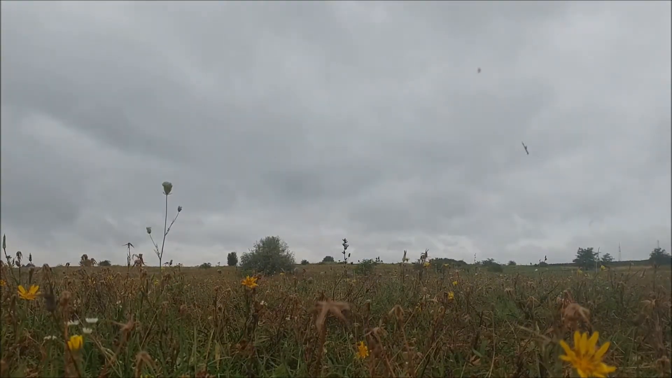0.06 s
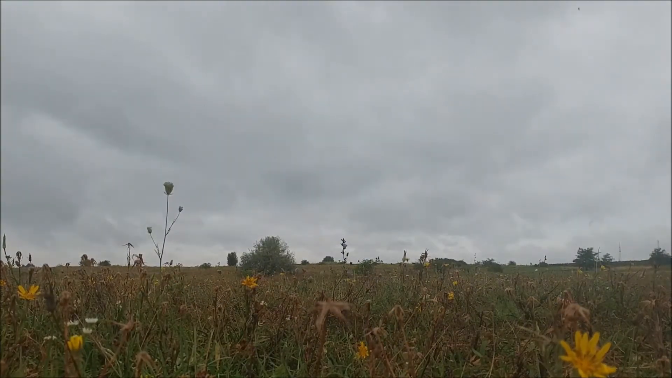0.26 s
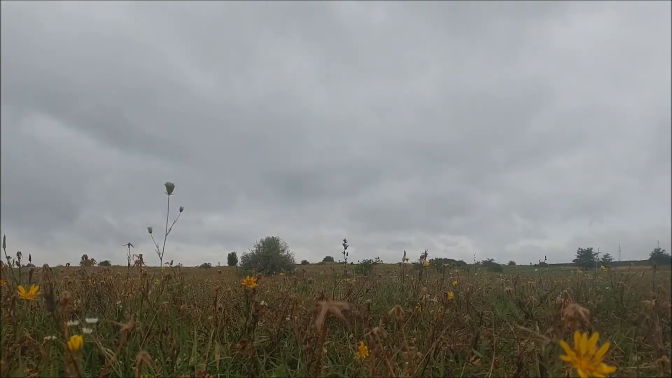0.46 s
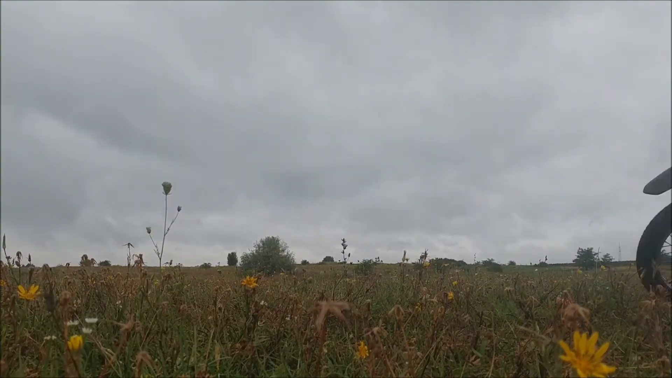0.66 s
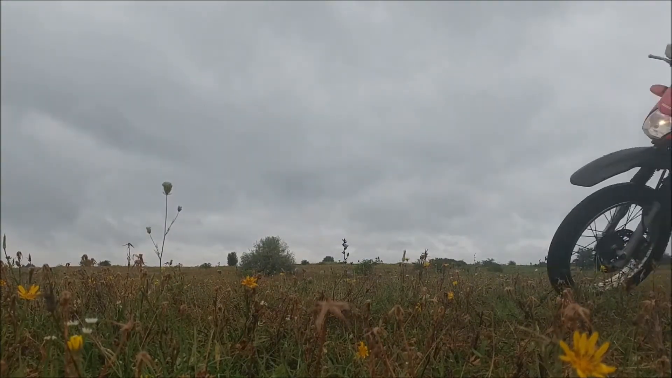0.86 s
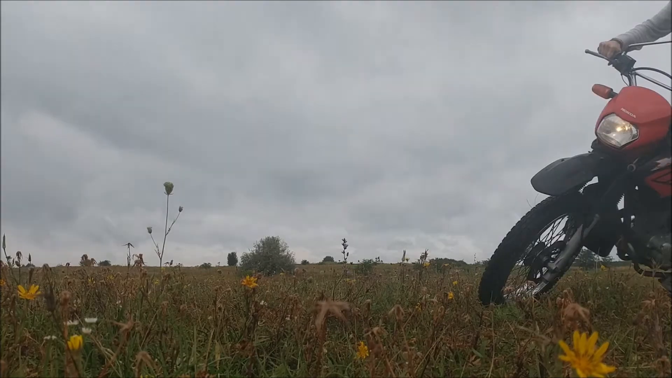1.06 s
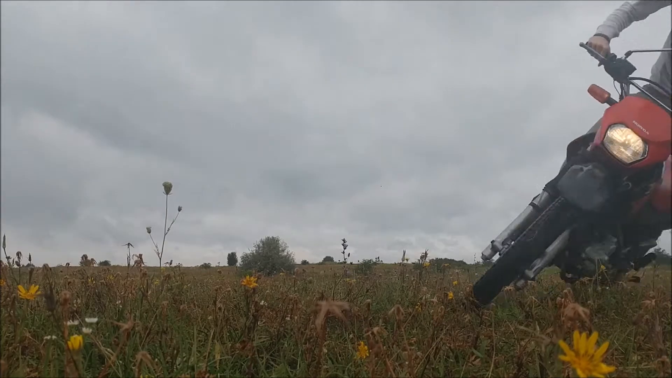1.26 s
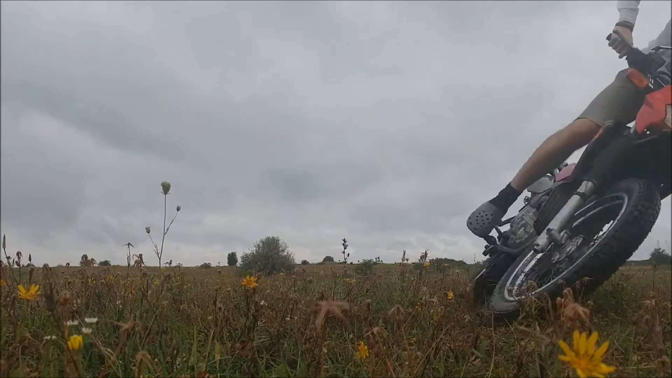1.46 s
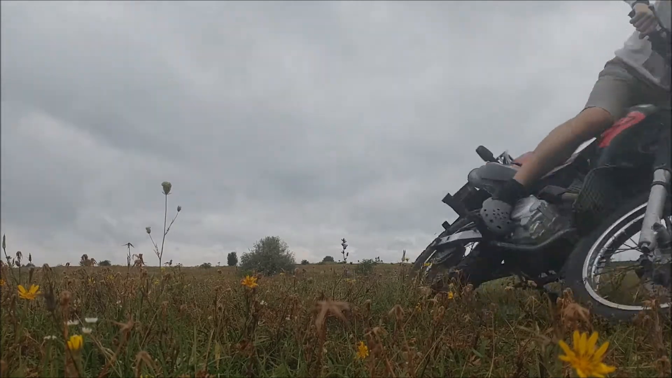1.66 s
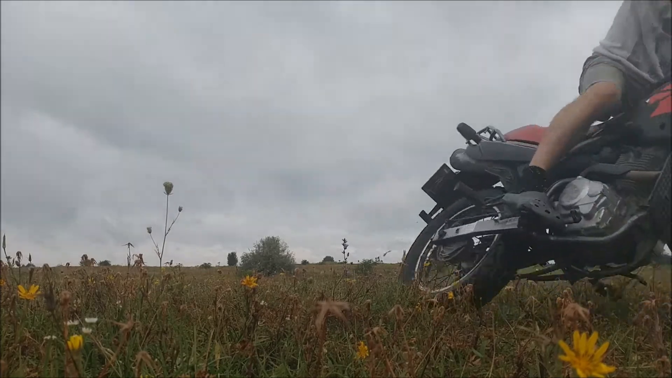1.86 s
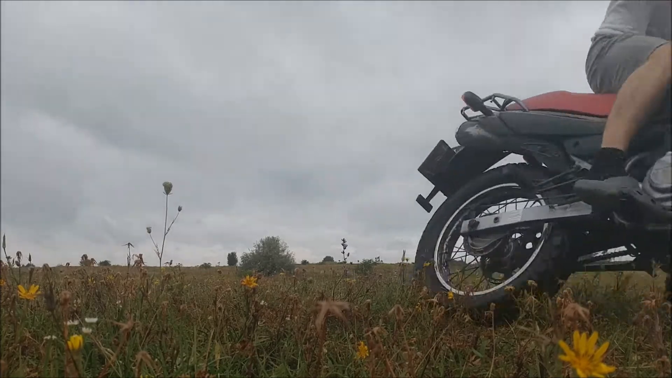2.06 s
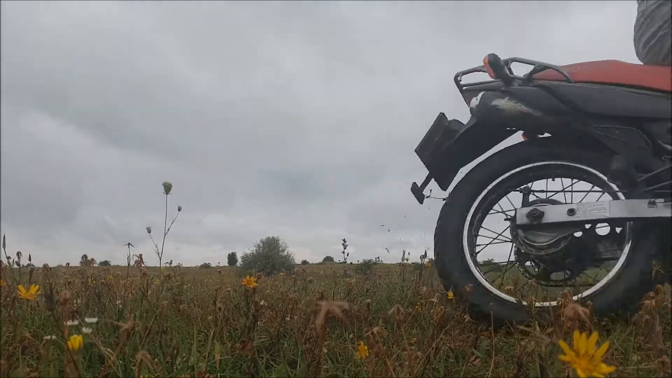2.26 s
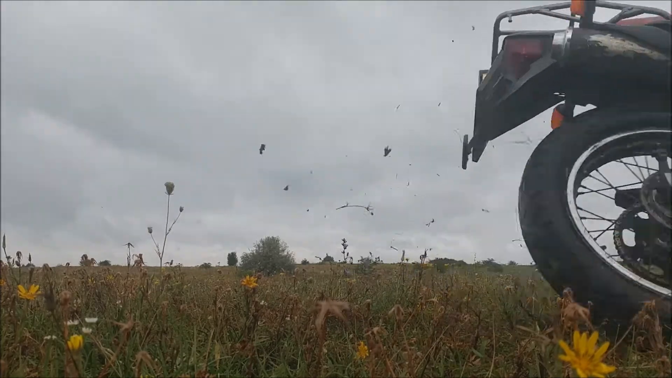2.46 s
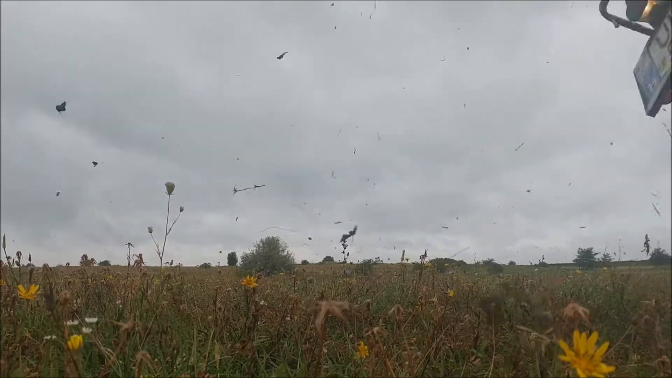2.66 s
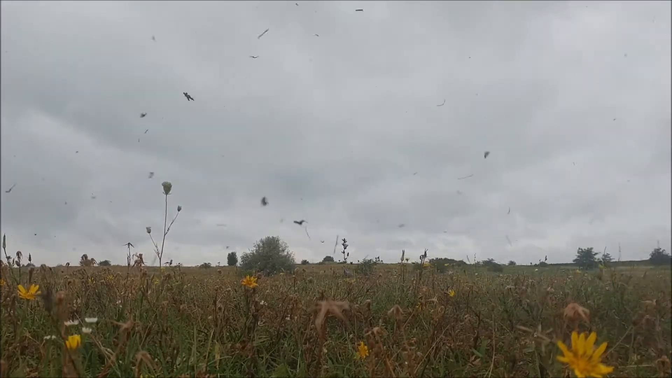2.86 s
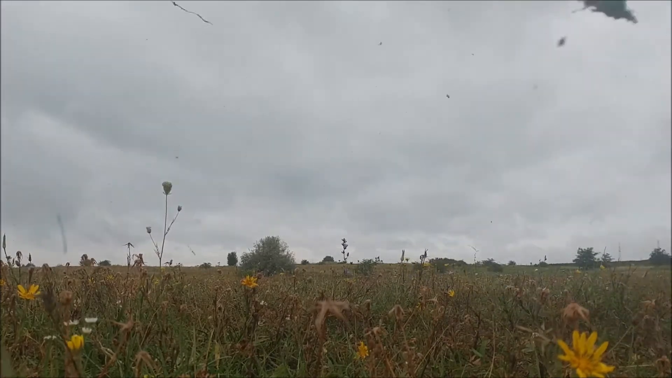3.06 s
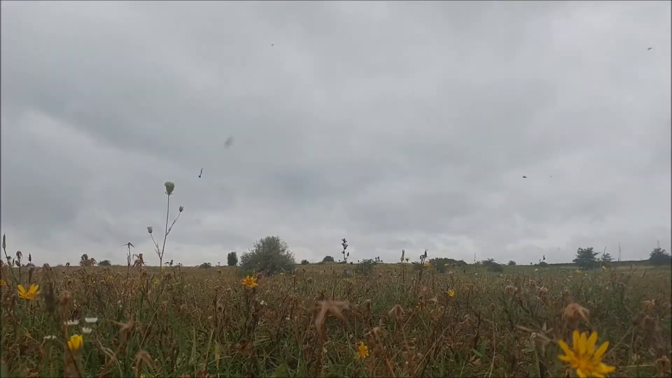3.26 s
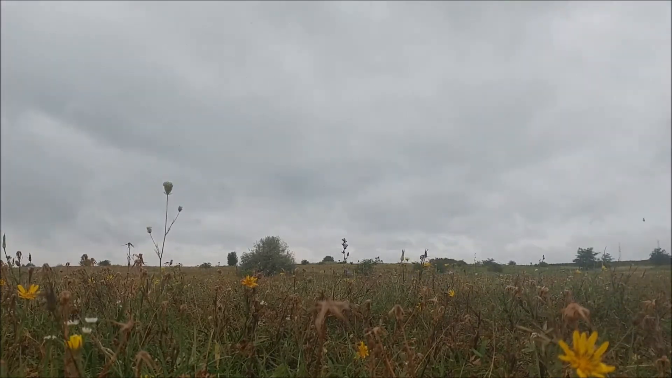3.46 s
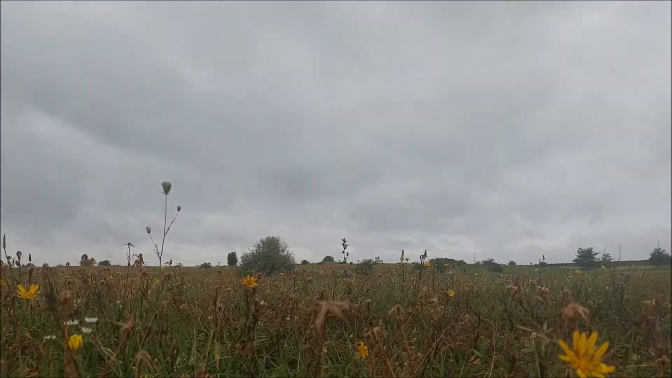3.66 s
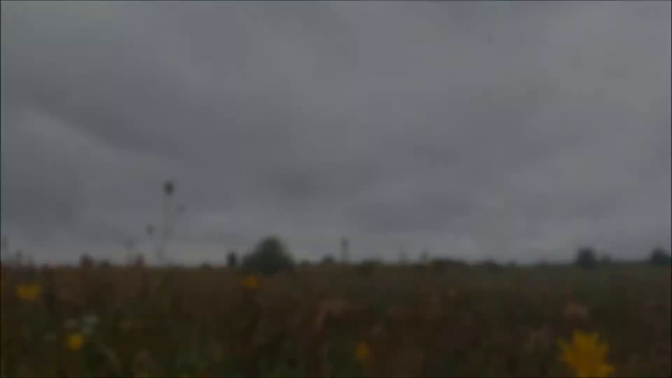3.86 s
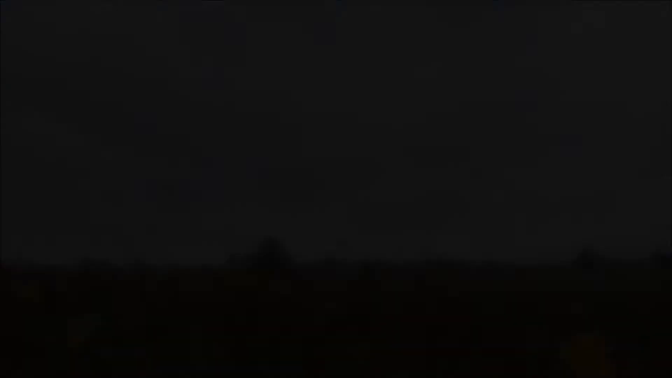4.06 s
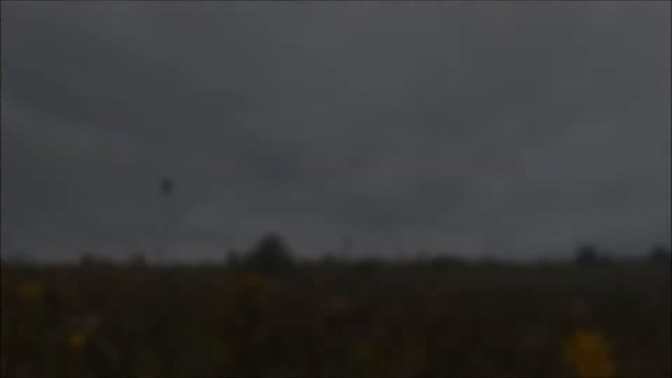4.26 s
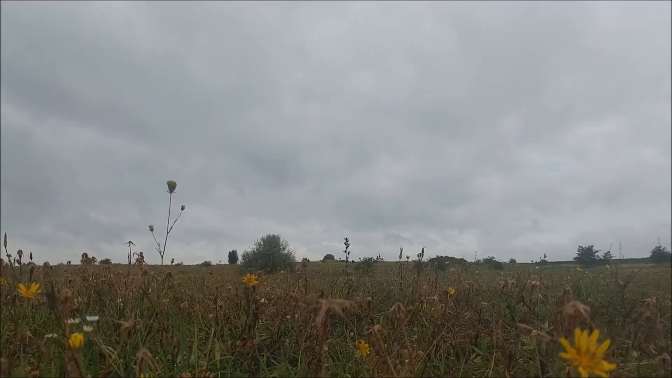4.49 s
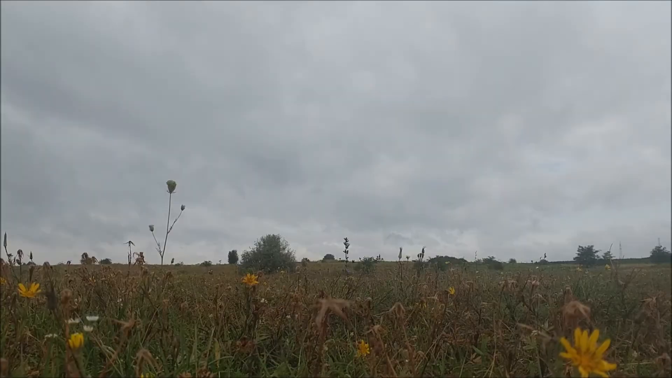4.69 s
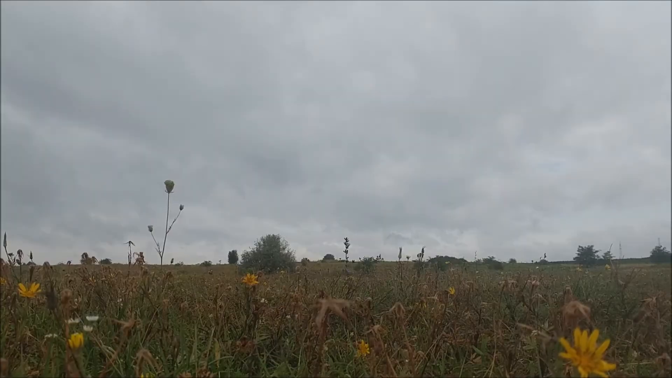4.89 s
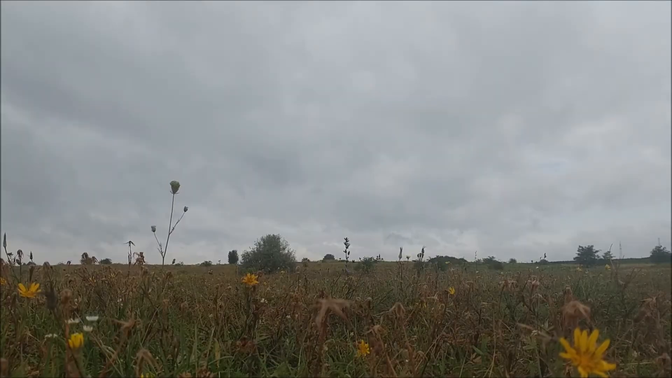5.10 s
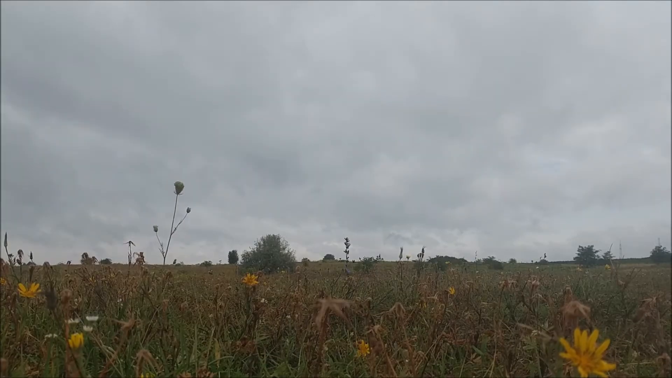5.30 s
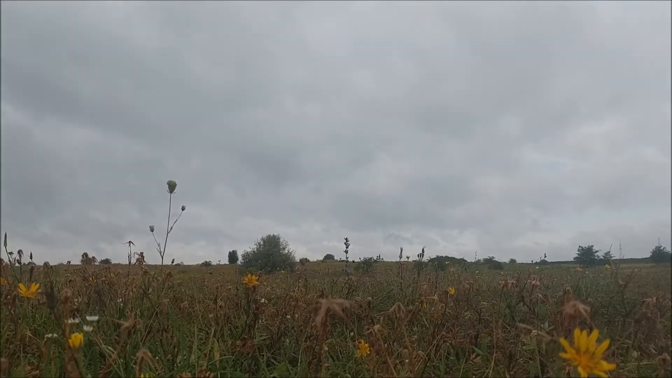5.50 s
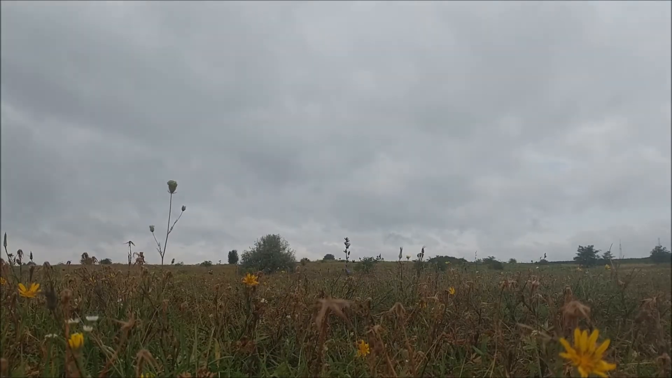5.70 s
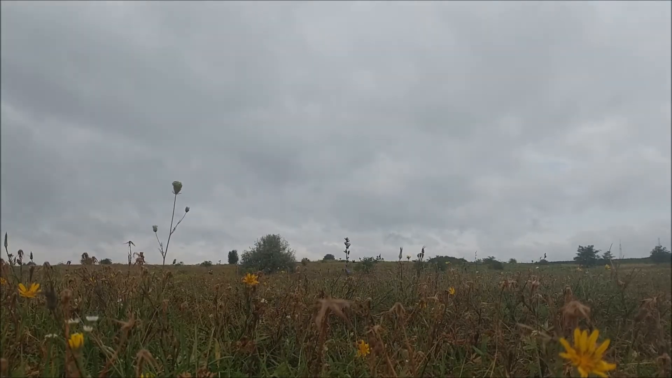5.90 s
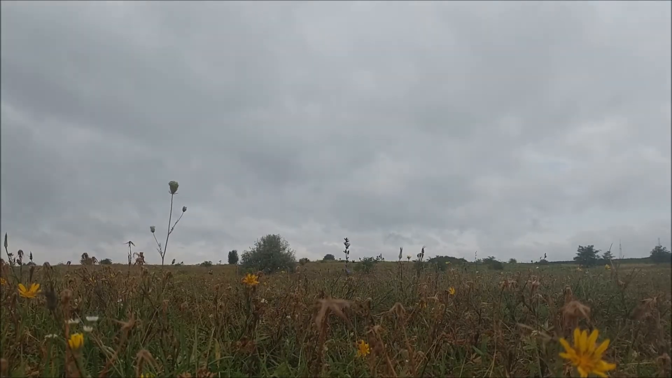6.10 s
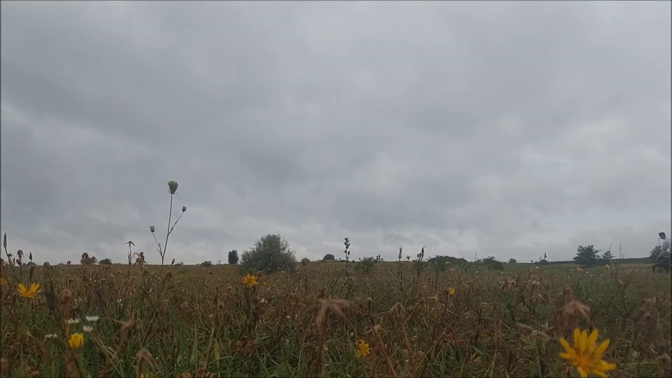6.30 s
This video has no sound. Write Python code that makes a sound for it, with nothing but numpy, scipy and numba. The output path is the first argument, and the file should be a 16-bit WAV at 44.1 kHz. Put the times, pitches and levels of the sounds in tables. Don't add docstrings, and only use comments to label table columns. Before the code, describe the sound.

In an open field, a small four-stroke motorcycle is already running very close to a low microphone. It revs up with a throaty bark, whine and metallic clatter, drops into popping overrun, then revs again as the tyre rips through stalks. Bits of grit tick nearby. The engine falls off sharply and fades into the distance with fainter pulls over soft air.

```python
import sys
import numpy as np
from scipy import signal
from scipy.fft import rfft, irfft, next_fast_len
from scipy.io import wavfile
from scipy.ndimage import uniform_filter1d, minimum_filter1d
from numba import njit

SR = 44100
rng = np.random.default_rng(int(sys.argv[2]) if len(sys.argv) > 2 else 0)


def elevation(decibels):
    levels = np.asarray(decibels, float)
    return 10 ** (levels / 20)


def generate_wav(signal):
    frames = np.transpose(np.atleast_2d(signal))
    scaled = np.clip(frames, -1, 1) * 32767
    pcm = np.round(scaled).astype(np.int16)
    wavfile.write(sys.argv[1], SR, pcm)


N = 279581
FAST = next_fast_len(N + SR // 10)


@njit
def svf(x, hz, width):
    y, b, l = np.empty(len(x)), 0., 0.
    g, k = np.tan(np.pi * hz / SR), width / hz
    for i in range(len(x)):
        v = (b + g * (x[i] - l)) / (1 + g * (g + k))
        b, l, y[i] = 2 * v - b, l + 2 * g * v, k * v
    return y


def svf_twice(x, hz, width_hz):
    return svf(svf(x, 1. * hz, 1. * width_hz), 1. * hz, 1. * width_hz)


def ring(x, modes):
    out = np.zeros(len(x))
    for k, (hz, width_hz, db) in enumerate(modes):
        out += (-1) ** k * elevation(db) * svf(x, 1. * hz, 1. * width_hz)
    return out


def band(x, lo_hz, hi_hz):
    return signal.sosfilt(signal.butter(4, [lo_hz, hi_hz], "bandpass", fs=SR, output="sos"), x)


def even(x):
    power = uniform_filter1d(uniform_filter1d(x ** 2, size=SR // 8), size=SR // 8)
    return x / np.sqrt(power + 1e-18)


def unit_rms(x):
    return x / np.sqrt(np.mean(x ** 2))


def curves(table):
    s, *columns = np.transpose(table)
    return [np.interp(np.arange(N) / SR, s, c) for c in columns]


def spans(table):
    t, twist_s = np.arange(N) / SR, .08
    on = np.array([np.clip(np.minimum(t - a, b - t) / twist_s + .5, 0, 1) for a, b, *_ in table])
    return np.array([(1, *row[2:]) for row in table]).T @ on


def over_hz(table):
    hz, *columns = np.transpose(table)
    log_hz = np.log(np.fft.rfftfreq(FAST, 1 / SR) + 1)
    return [np.interp(log_hz, np.log(hz), c) for c in columns]


def colour(x, table):
    return unit_rms(irfft(rfft(x, FAST) * elevation(over_hz(table)[0]), FAST)[:N])


def clicks(where, size):
    out = np.zeros(N + 1)
    where = np.clip(where, 0, N - 1)
    np.add.at(out, where.astype(int), size * (1 - where % 1))
    np.add.at(out, where.astype(int) + 1, size * (where % 1))
    return out[:N]


def walk(rate_hz):
    k = int(SR / rate_hz)
    return 1.2 * uniform_filter1d(np.repeat(rng.standard_normal(N // k + 1), k), k)[:N]


def engine():
    away = np.interp(np.arange(N) / SR, [3.4, 4.1], [0, 1])
    hz, rough, intake, whine_gain, level = controls(away)
    cycle = crank(hz)
    firing, suck = strokes(cycle, rough)
    pulses = firing - intake * suck
    gas = (.5 + np.exp(-(cycle % 1) / .5)) * rng.standard_normal(N) * np.sqrt(hz / SR)
    body = chug(cycle, rough, level)
    body = body + exhaust_boom(pulses, gas, rough, away, level["boom"])
    body = body + exhaust_bark(pulses, gas, rough, intake, level["bark"])
    body = body + silencer_rasp(pulses, gas, rough, away, level["rasp"])
    body = body + gear_whine(cycle, whine_gain, level) + rumble(rough, level["bark"])
    return body, metal_rattle(cycle, hz, away, level["rattle"])


def controls(away):
    # time in seconds, firing rate in Hz.
    speed = [(0, 39.97), (.3, 32.86), (.7, 38), (.98, 45.46), (1.14, 49.26), (1.4, 49.29), (1.6, 44.28),
             (1.98, 28.94), (2.35, 42.18), (2.51, 47.59), (2.66, 49.82), (3.08, 50.21), (3.18, 47.83),
             (3.28, 44.77), (3.55, 31.03), (3.73, 29.17), (3.8, 40.76), (4.25, 29.91), (4.55, 29.37),
             (5.18, 32.26), (5.4, 42.5), (5.62, 40.6)]
    # time in seconds, exhaust level in dB with the throttle shut.
    exhaust = [(0, -22), (.25, -18.5), (.9, -15), (1.15, -19.5), (1.38, -19), (1.46, -22), (1.9, -19.5),
               (2.1, -13), (2.6, -15), (3.15, -19), (3.35, -23.5), (3.55, -34), (4.1, -35.5), (4.5, -32.5),
               (5.1, -33.5), (5.6, -54), (6.1, -40), (6.34, -53)]
    # time in seconds, level in dB.
    facing = [(0, -2), (.3, -10.5), (.85, -9), (1.15, -1.5), (1.3, -1.5), (1.45, -3.5), (1.75, -2),
              (2.1, -8), (2.55, -5.5), (2.8, -4.5), (3.05, -9), (3.4, -6), (3.8, -8), (4.5, -15),
              (5.2, -13.5), (5.6, -9), (6.1, -13)]
    # start and end in seconds, roughness 0-1, intake share 0-1.
    throttle = [(.13, .95, .13, .62), (.95, 1.17, .12, .42), (1.17, 1.41, .28, .2), (1.95, 2.45, .12, .1),
                (2.45, 2.72, .16, .15), (2.72, 2.98, .34, .15), (2.98, 3.55, .22, .15),
                (4.2, 5.06, .18, .15), (5.23, 5.38, .17, .15), (5.38, 5.9, .25, .1), (5.9, 6.5, .1, .1)]
    # start and end in seconds, exhaust gain in dB, once-a-turn thump gain in dB.
    thump = [(.12, .21, 1.5, -0.5), (.21, 1.18, 3.5, 7.5), (1.97, 2.58, 2, 7.5), (2.72, 2.98, 0, 9),
             (3.03, 3.38, 0, 7.5), (3.45, 3.62, 2.5, 13.5), (3.8, 4.1, -0.5, 15), (4.2, 5.07, 6.5, 0.5),
             (5.09, 5.22, -9, 11), (5.24, 5.4, 16, 1), (5.9, 6.27, 6, 5.5)]
    # start and end in seconds, whine over exhaust in dB, its octave in dB.
    gears = [(.9, 1.22, 7, -12), (1.36, 1.6, -6.5, 10.5), (1.6, 1.85, -15, -2), (1.95, 2.36, -4, -14.5),
             (2.36, 2.6, -3.5, -1.5), (2.6, 2.97, -2.5, -3.5), (2.97, 3.2, 4.5, -5.5),
             (3.2, 3.37, 9.5, -17), (3.42, 3.56, 5, -7), (5.26, 5.38, 2, -18), (5.92, 6.1, 8, -15),
             (6.1, 6.27, 10.5, -11)]
    # start and end in seconds, level over exhaust in dB.
    shaft = [
        (.93, 1.2, -13),
        (2.25, 2.5, -17),
        (2.5, 2.8, -20),
    ]
    # dB over exhaust, dB per Hz above 40 Hz firing, share of facing, share of pull.
    layers = dict(first=(-36.5, 2.04, -1.05, -1.5), second=(-10, 0.15, 0.46, 1.72),
              third=(-8.5, -0.29, 0.92, 0.98), boom=(-10.5, 0.15, 0.06, 0.84), bark=(-1.3, 0.086, -0.14, 1),
              rasp=(0, 0.11, 1, 0.78), rattle=(-11.5, 0.2032, 1.04, 0.55))
    far_db = dict(first=-9, second=0, third=5.5, boom=10.5, bark=-1, rasp=4, rattle=-2)
    (hz,), (level_db,), (facing_db,) = curves(speed), curves(exhaust), curves(facing)
    held, rough, intake = spans(throttle)
    _, pull_db, thump_db = spans(thump)
    level = {}
    for k, (base_db, db_per_hz, share, load) in layers.items():
        level[k] = level_db + base_db + db_per_hz * (hz - 40) + share * facing_db + load * pull_db
        level[k] = level[k] + far_db[k] * away
    level["second"] = level["second"] + thump_db
    meshed, whine_db, level["octave"] = spans(gears)
    singing, shaft_db = spans(shaft)
    level["shaft"] = singing * elevation(level_db + pull_db + shaft_db / np.maximum(singing, 1e-3))
    whine_gain = meshed * elevation(level_db + pull_db + whine_db)
    coast_rough, coast_intake = .5, .1
    return hz, rough + (1 - held) * coast_rough, intake + (1 - held) * coast_intake, whine_gain, level


def crank(hz):
    # time in seconds, lead in cycles.
    lead_cycles = [(0, -0.24), (.12, -0.16), (.25, -.48), (.3, -0.42), (.57, -0.26), (.82, -0.019), (1.4, 0.031),
                   (2.05, -.32), (2.22, -0.36), (2.4, -0.42), (3.6, -.5), (4.36, -0.56), (4.62, -0.64),
                   (4.9, -0.69), (5.3, -.55)]
    return .3 + np.cumsum(hz) / SR + curves(lead_cycles)[0]


def strokes(cycle, rough):
    time_luck, size_luck, suck_time_luck, suck_size_luck = rng.standard_normal((4, 400))
    number = np.arange(400)
    at = np.interp(number, cycle, np.arange(N))
    alive = (number > cycle[0]) & (number < cycle[-1])
    ragged = rough[at.astype(int)]
    firing = clicks(at + SR * .0011 * ragged * time_luck, alive * elevation(6.0 * ragged * size_luck))
    late = np.interp(number + np.array([[1], [2], [3]]) / 4, cycle, np.arange(N))
    swing = np.array([[1], [-.8], [.1]])
    suck_size = swing * alive * elevation(5.0 * ragged * suck_size_luck)
    return firing, clicks(late + SR * .001 * ragged * suck_time_luck, suck_size)


def chug(cycle, rough, level):
    out = np.zeros(N)
    for order, (name, lag_rad) in enumerate([("first", .3), ("second", .6), ("third", .9)], 1):
        gain = np.sqrt(2) * elevation(level[name] + 4.0 * rough * walk(25))
        out += gain * np.cos(order * 2 * np.pi * cycle + lag_rad)
    return out


def sweep(x):
    late_s = .007 * np.minimum(np.fft.rfftfreq(FAST, 1 / SR), 800) / 500
    phase = 2 * np.pi * np.cumsum(late_s) * SR / FAST
    return irfft(rfft(x, FAST) * np.exp(-1j * phase), FAST)[:N]


def exhaust_boom(pulses, gas, rough, away, db):
    # resonance in Hz, width in Hz, level in dB.
    box = [(128, 30, 16), (185, 150, -26.5)]
    lead_s = .011
    boom = elevation(db - 2.5) * even(sweep(band(ring(pulses + 1.5 * rough * gas, box), 115, 240)))
    return (1 - away) * boom + away * np.roll(boom, -int(lead_s * SR))


def exhaust_bark(pulses, gas, rough, intake, db):
    # resonance in Hz, width in Hz, level in dB.
    pipe = [(220, 41, -2), (308.5, 75.4, 7), (345.7, 38, 9.5), (381.2, 22.5, 6), (422, 197, -3),
            (530, 42, -5)]
    # resonance in Hz, width in Hz, level in dB.
    inlet = [(443.7, 25, 14.5), (473, 136, 7)]
    # resonance in Hz, width in Hz, level in dB.
    tail = [(173, 81, -4.5), (306, 118.6, 8.5), (456, 190, -3.5)]
    # start and end in seconds, share 0-1.
    behind_spans = [
        (1.95, 2.58, .75),
        (3.7, 6.5, .8),
    ]
    puffs = pulses + 1.1 * rough * gas
    near = ring(puffs, pipe) + intake ** 2 * ring(puffs, inlet)
    rear = ring(puffs, tail)
    behind = spans(behind_spans)[1]
    bark = (1 - behind) * even(band(near, 175, 560)) + behind * even(band(rear, 95, 560))
    return elevation(db - 1.5) * even(sweep(bark))


def chambers(x):
    t, decay_s = np.arange(SR // 12) / SR, .03
    out = np.zeros(N)
    for path in rng.standard_normal((3, len(t))):
        echoes = signal.fftconvolve(x, path * np.exp(-t / decay_s))[:N]
        out += (.6 + .6 * walk(3)) * echoes
    return out / np.sqrt(decay_s * SR)


def silencer_rasp(pulses, gas, rough, away, db):
    # resonance in Hz, width in Hz, level in dB.
    silencer = [(682, 187, -2.5), (804, 133, 1), (900.6, 73, 2), (1047, 87, -4), (1150, 52, -6.5),
                (1374, 180, -18.5)]
    # resonance in Hz, width in Hz, level in dB.
    tail_rasp = [(653, 59, 5.5)]
    rush = (1 - .35 * away) * chambers(pulses) + .35 * away * pulses
    rush = rush + (.16 + 1.3 * rough) * (1 - .3 * away) * gas
    near = band(ring(rush, silencer), 580, 1560)
    far = band(near + ring(rush, tail_rasp), 400, 1060)
    return elevation(db - .7) * even(sweep((1 - away ** 3) * near + away ** 3 * far))


def gear_whine(cycle, whine_gain, level):
    turn = 2 * np.pi * cycle
    octave = elevation(level["octave"] + 2.0 * walk(30)) * np.cos(16 * turn + .9 * walk(40))
    mesh = whine_gain * elevation(-3 + 4.5 * np.tanh(walk(28))) * (np.cos(8 * turn) + octave)
    return mesh + level["shaft"] * elevation(3.0 * walk(30)) * np.cos(24 * turn + .8 * walk(40))


def rumble(rough, bark_db):
    return elevation(bark_db + 2.0) * rough * even(band(rng.standard_normal(N), 45.8, 213))


def metal_rattle(cycle, hz, away, db):
    # frequency in Hz, density in dB per Hz.
    cases = [(880, -13), (1500, -2), (1810, -8), (2260, -4.5), (2520, -8.5), (2810, -10), (3060, -11),
             (3350, -8), (4360, -12.5), (6910, -11.5), (8080, -15.5), (9260, -34.5), (10400, -26.5),
             (13300, -30), (15600, -26)]
    # frequency in Hz, density in dB per Hz.
    far_cases = [(880, -30), (1500, -7), (1930, -10), (2260, -5), (3030, -10), (3380, -5), (4000, -15.5),
                 (4750, -29), (5100, -13), (9450, -14.5), (12500, -24), (15600, -35.5)]
    # start and end in seconds, gain in dB.
    clatter = [
        (1., 1.2, 0),
        (1.5, 1.93, -3.5),
        (2.4, 2.62, 3),
        (2.9, 3.35, -0.5),
        (3.5, 3.8, 3.5),
        (3.8, 4.2, 4),
        (4.25, 5.08, 0.5),
    ]
    shut = np.exp(-(cycle % 1) / .2) + .35 * np.exp(-((cycle + .5) % 1) / .1)
    valves = .8 - .66 * away + elevation((3.6 - 2.0 * away) * np.tanh(walk(25))) * shut
    ticks = (rng.random(N) < 400 / SR) * elevation(3.5 * rng.exponential(size=N))
    common, *own = rng.standard_normal((3, N))
    chain = svf(ticks * np.sign(common), 5500., 2500.)
    shared = valves * common + 2.2 * (1 - away) * (hz / 46) ** 2 * chain
    sides = []
    for noise in own:
        x = shared + 1.2 * valves * noise
        near = colour(x, cases) + 0.17 * covers(x)
        far = colour(x, far_cases) + 1.63 * band(x, 4920, 6760)
        sides.append((1 - away) * near + away * far)
    flutter_db = 0.89 * (1.5 - away) * np.tanh(walk(8.4))
    return elevation(db + spans(clatter)[1] - 3.5 + flutter_db) * np.array(sides)


def covers(x):
    # resonance in Hz, width in Hz, level in dB.
    sheets = [(2290, 120, -1), (2810, 160, 1), (3400, 260, 0), (4200, 300, -4), (5300, 400, -4),
              (6950, 700, 3)]
    out = np.zeros(N)
    for hz, width_hz, db in sheets:
        out += elevation(db + 5.0 * walk(7)) * svf_twice(x, hz, 1.1 * width_hz) / np.sqrt(width_hz)
    return unit_rms(out)


def wheelspin():
    # start and end in seconds, level in dB.
    loose = [
        (2.35, 2.58, -43),
        (2.58, 2.8, -35.5),
    ]
    on, db = spans(loose)
    grains = rng.standard_normal(N) * elevation(0.93 * walk(60))
    return on * elevation(db / np.maximum(on, 1e-3)) * even(svf_twice(grains, 2790, 410))


def puff(t, hz):
    return (1 - np.exp(-t / .0006)) * np.exp(-t / .017) * np.sin(2 * np.pi * hz * t)


def pops():
    # start in seconds, level in dB, pipe in Hz, silencer over pipe in dB, silencer in Hz.
    burns = [(0.003, -29.5, 214.7, 7.5, 860), (0.016, -16.5, 313, -16, 900), (0.096, -16, 419, -5.5, 892),
             (0.715, -23, 400, 3, 1025), (1.268, -12.5, 354, -18, 760), (1.327, -10, 352, -30, 810),
             (1.35, -14, 342, -21, 769), (1.389, -14.5, 345, 2, 788), (1.54, -17.5, 325, -10, 1016),
             (1.599, -13, 336, -4, 718), (1.685, -10, 319.4, -10, 708), (1.776, -12.5, 292.6, -20, 712),
             (1.859, -19.5, 250.4, 0.5, 995), (2.573, -18, 398, 3, 773.4), (2.673, -13, 347, -1.5, 801),
             (2.87, -16, 415, -4.5, 826), (3.43, -36, 301, 7, 879), (3.555, -39, 284, 6.5, 934),
             (3.601, -23.5, 373, -31, 970)]
    out = np.zeros(N)
    t, pipe_late_s = np.arange(SR // 10) / SR, .0027
    for s, db, pipe_hz, crack_db, crack_hz in burns:
        hiss = 0.5 * np.exp(-t / .017) * band(rng.standard_normal(len(t)), 290, 1700)
        crack = elevation(crack_db) * (puff(t, crack_hz) + hiss)
        start = int(s * SR)
        out[start:start + len(t)] += elevation(db + 4.5) * (puff(np.maximum(t - pipe_late_s, 0), pipe_hz) + crack)
    return out


def grit():
    # start in seconds, level in dB, resonance in Hz, left minus right in dB.
    bits = [(0.2322, -10.5, 6950, 17.5), (0.262, -27, 6820, 5.5), (0.4065, -28.5, 6990, 12.5),
            (1.323, -16.5, 6600, 6.5), (2.0553, -28, 3702, -14), (2.51, -20, 6700, 14),
            (3.274, -22, 1150, -9), (0.3162, -30, 3310, 5.5), (0.375, -29, 3400, 8.5),
            (0.4902, -25, 3230, -5), (0.813, -28, 3400, 1.5), (1.0989, -19, 6370, 13),
            (1.448, -22, 6450, 1), (2.381, -19.5, 3408, -10.5), (0.2335, -23, 3210, -2),
            (3.355, -27, 2678, -2), (4.2292, -39, 5817, 11.5), (5.869, -51.5, 5970, 10),
            (1.9465, -48, 10400, 5), (1.9817, -46, 10500, 9), (2.016, -38, 10400, 8),
            (2.0513, -39, 10400, 11), (2.1131, -44, 10520, 9), (3.779, -59, 8930, 3),
            (3.8487, -49, 7475, 9), (4.962, -52, 7510, 3), (0.2319, -32, 12340, 9)]
    out = np.zeros((2, N))
    t = np.arange(SR // 40) / SR
    for s, db, hz, pan_db in bits:
        hit = clicks(SR * np.array([.0002, .0019, .0062]), elevation([0, -9, -16]))[:len(t)]
        hit = hit + 0.085 * np.exp(-t / 0.005) * rng.standard_normal(len(t))
        tick = svf_twice(hit, hz, 1800) + 0.017 * svf(hit, 11060., 9000.)
        side_db = np.array([[pan_db], [-pan_db]]) / 2
        start = int(s * SR)
        out[:, start:start + len(t)] += elevation(db - 1.5 + side_db) * tick / np.abs(tick).max()
    return out


def field():
    # frequency in Hz, density in dB per Hz.
    air_spectrum = [(18, -39), (30, -20), (76, -1), (270, -12), (352, -3), (552, -30), (850, -16.5),
                    (1600, -53.5), (2080, -92), (3520, -120)]
    # frequency in Hz, density in dB per Hz.
    hiss_spectrum = [(880, -48), (1500, -14.5), (1740, -13.5), (2670, -12.5), (4710, -12.5), (5200, -5.5),
                     (8910, -17), (13700, -19.5), (15600, -30)]
    air_db, swell_db, hiss_db = -36.5, 1.2, -70
    hiss = np.array([colour(own, hiss_spectrum) for own in rng.standard_normal((2, N))])
    air = elevation(air_db + swell_db * walk(3.13)) * colour(rng.standard_normal(N), air_spectrum)
    return air + elevation(hiss_db) * hiss


def scene():
    # frequency in Hz, left minus right in dB, left lead in radians.
    port_split = [(60, -.2, -.09), (200, 0, -.13), (380, 1.6, -.2), (560, -1, -1.4), (750, -2.8, -.9),
                  (1200, 2, -.7), (2000, -.7, -1.7), (4400, 1, -1.7), (8000, 5.5, -1.6), (15000, 6.5, -1.6)]
    body, rattle = engine()
    scatter_db, scatter_s = -16, 0.028
    scatter = elevation(scatter_db) * np.roll(band(body, 410, 1400), int(scatter_s * SR))
    rattle = rattle + scatter * np.array([[1], [-1]])
    pan_db, lead_rad = over_hz(port_split)
    left = elevation(pan_db / 2) * np.exp(.5j * lead_rad)
    right = elevation(-pan_db / 2) * np.exp(-.5j * lead_rad)
    mix = body + pops() + field() + rattle + wheelspin()
    return irfft(rfft(mix, FAST) * np.array([left, right]), FAST)[:, :N] + grit()


def band_limit(x):
    return signal.sosfilt(signal.butter(12, 15710, fs=SR, output="sos"), x)


def record(dry):
    # start and end in seconds, depth 0-1 of the upper and of the lower dip.
    dips = [
        (-.1, .3, .3, .4),
        (.3, .75, .8, .6),
        (.75, 1.3, 1, 1),
        (1.3, 2.3, .3, .92),
        (2.3, 6.5, .1, .15),
    ]
    ceiling_db = -1
    room = np.minimum(1, elevation(ceiling_db) / (np.abs(dry).max(axis=0) + 1e-9))
    gain = uniform_filter1d(minimum_filter1d(room, size=SR // 50), size=SR // 50)
    heard = signal.sosfilt(signal.butter(2, 30, "highpass", fs=SR, output="sos"), dry * gain)
    for depth, dip_hz in zip(spans(dips)[1:], (1960., 1760.)):
        heard = heard - depth * np.array([svf(side, dip_hz, 300.) for side in heard])
    return band_limit(heard)


dry = scene()
out = record(dry)
generate_wav(out)
```